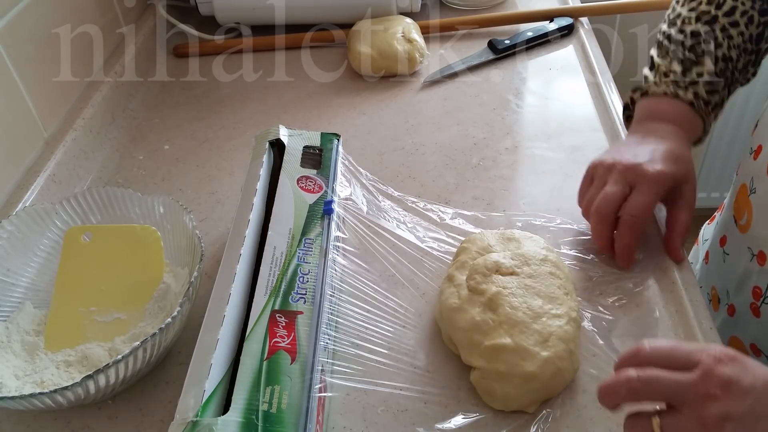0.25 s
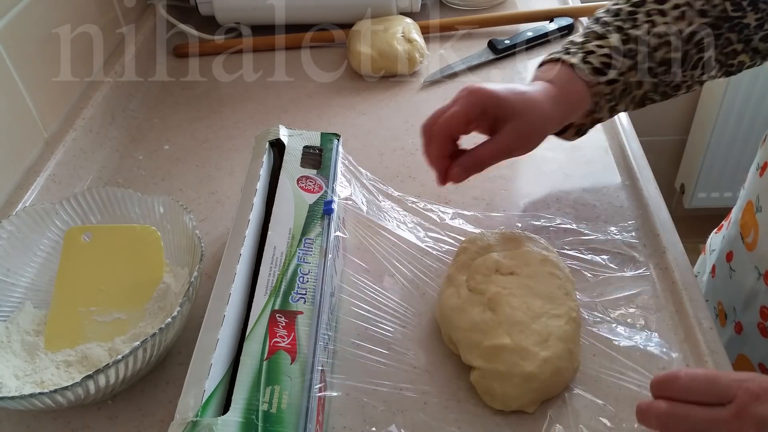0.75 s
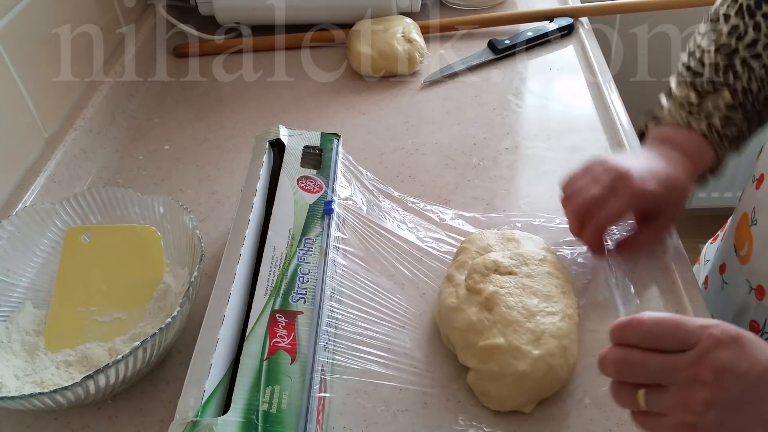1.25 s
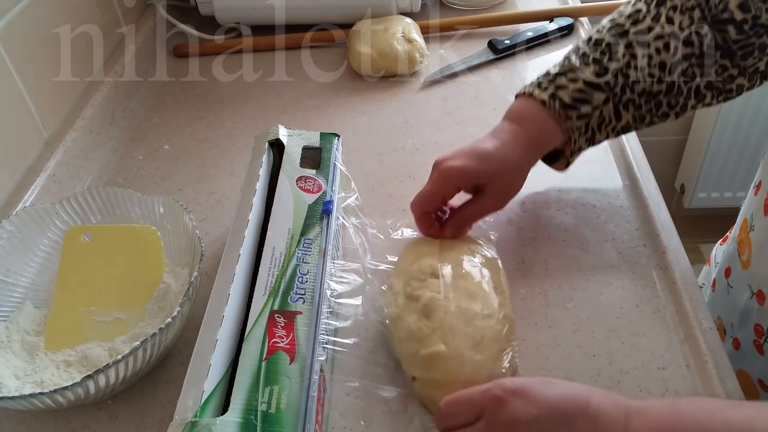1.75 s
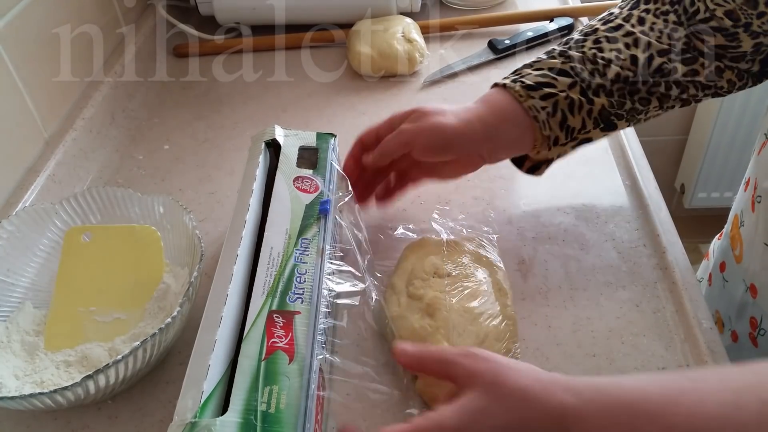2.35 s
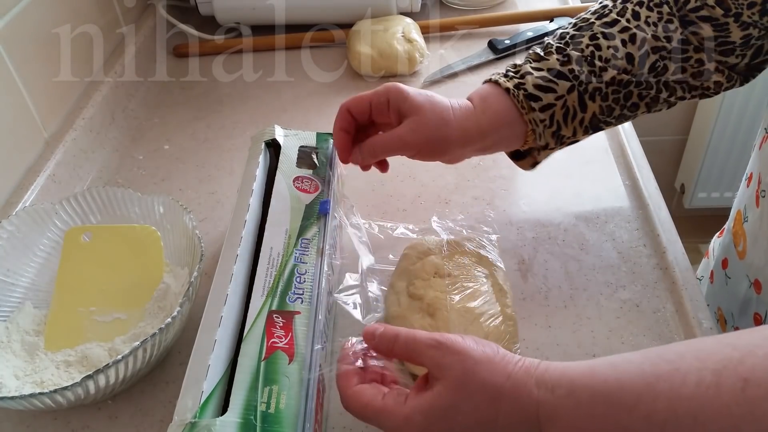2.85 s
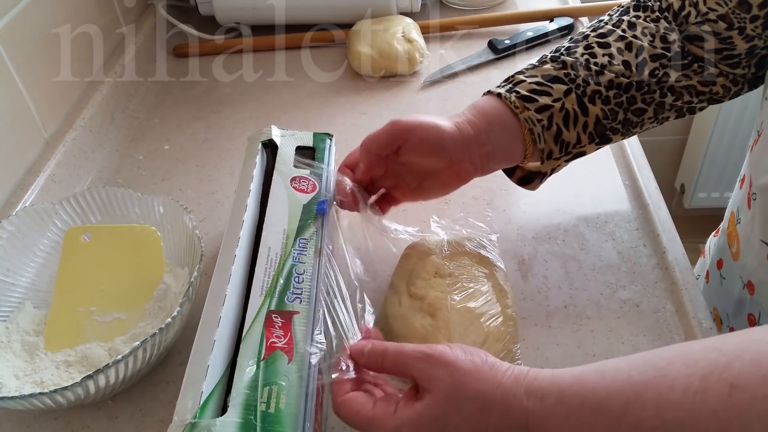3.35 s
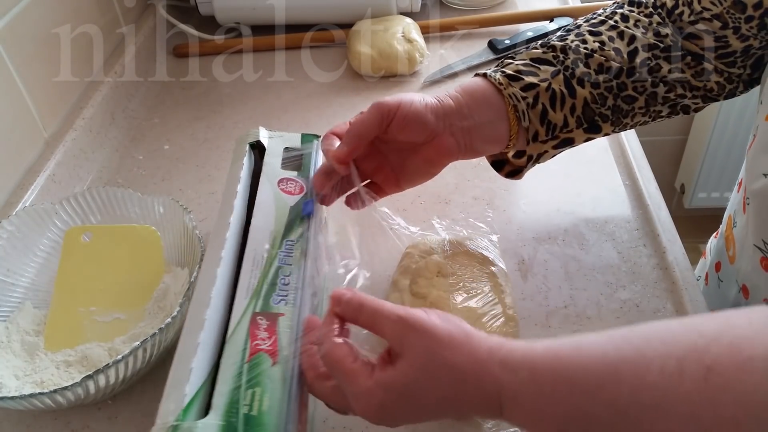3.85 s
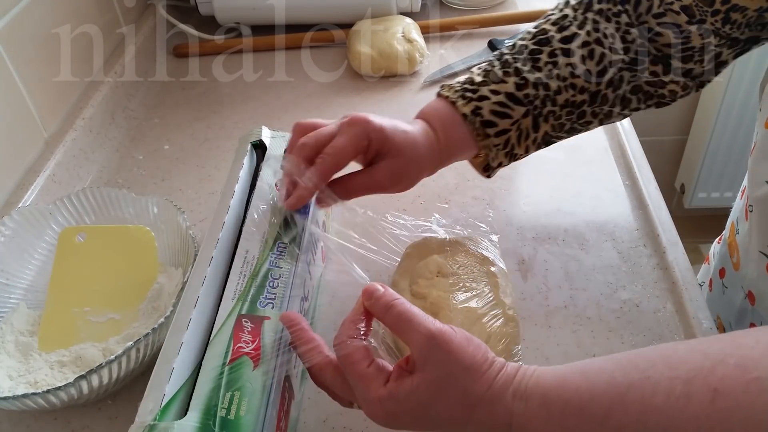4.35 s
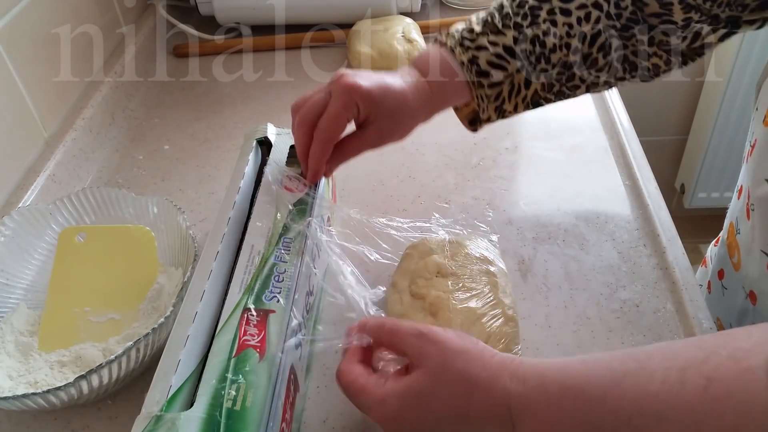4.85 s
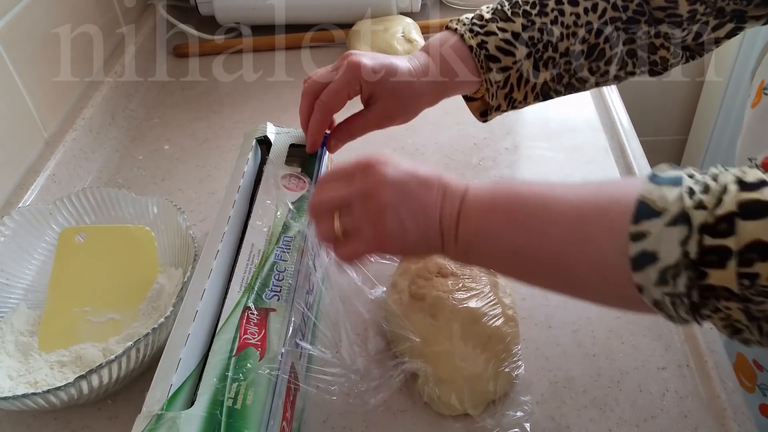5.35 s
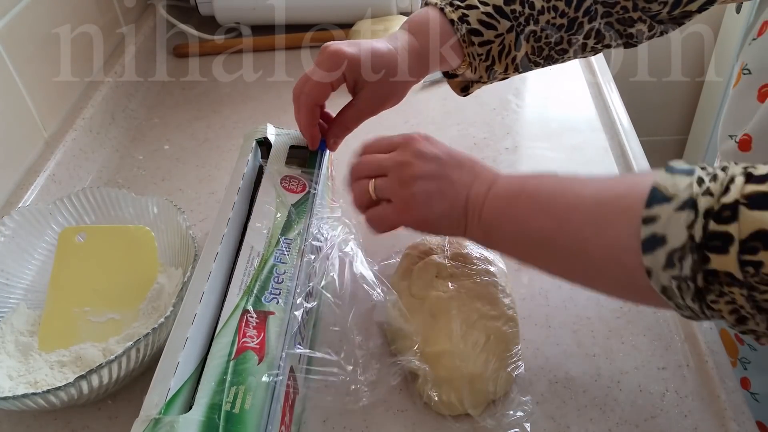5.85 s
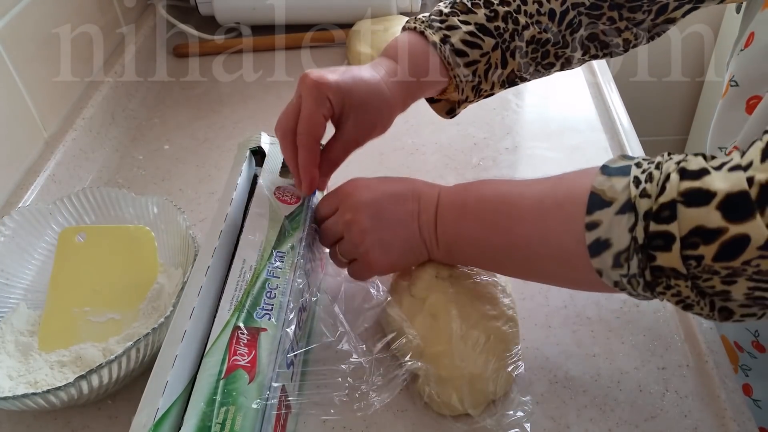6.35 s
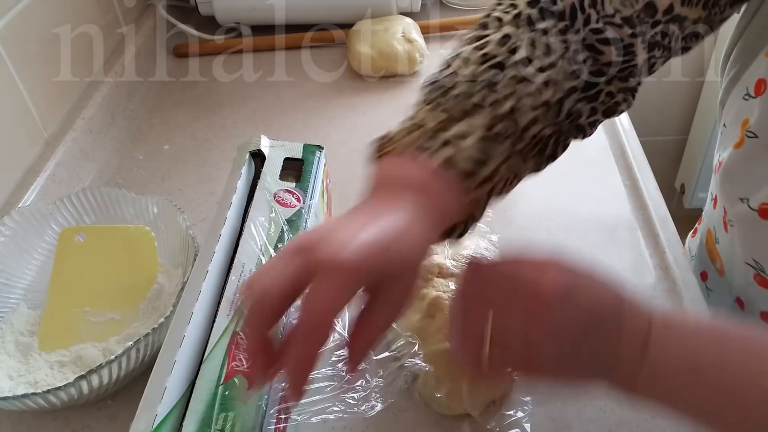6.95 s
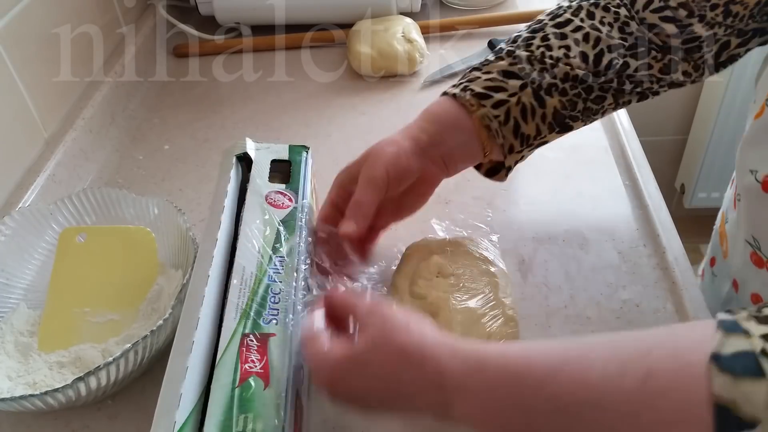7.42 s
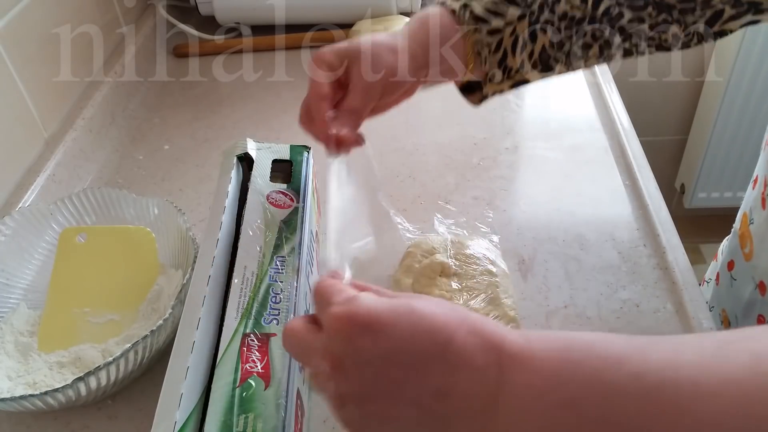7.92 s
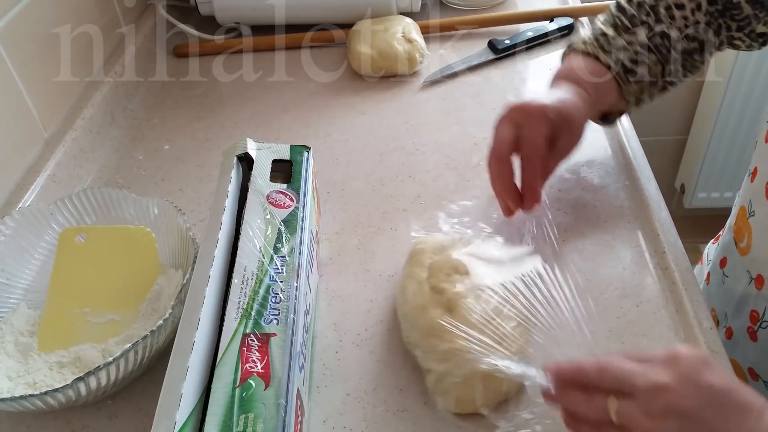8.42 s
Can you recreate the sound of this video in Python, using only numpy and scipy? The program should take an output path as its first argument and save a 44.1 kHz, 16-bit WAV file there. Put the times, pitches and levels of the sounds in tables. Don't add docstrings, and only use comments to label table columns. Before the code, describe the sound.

Hands work thin plastic film on a counter, heard at arm's length by a small stereo microphone with steady hiss, stronger on the left. Quiet crinkles and isolated ticks lead to light cardboard taps, then a cluster of hollow knocks. After a calmer stretch, another thump and dense crackling with bumps follow, then crisp loud snaps and a soft finish. A distant fridge hums; the room is small with a short tail.

```python
import sys
import numpy as np
from scipy import signal
from scipy.fft import rfft, irfft
from scipy.io import wavfile

SR = 44100
rng = np.random.default_rng(int(sys.argv[2]) if len(sys.argv) > 2 else 0)


def voltage_ratio(decibels):
    exponent = np.asarray(decibels, float) / 20
    return 10 ** exponent


def wrap_up_sound(samples):
    columns = np.atleast_2d(samples).T
    tamed = np.clip(columns, -1, 1)
    steps = np.round(tamed * 32767).astype(np.int16)
    wavfile.write(sys.argv[1], SR, steps)


N = 382684


def rms_one(x):
    return x / np.sqrt(np.mean(x ** 2) + 1e-20)


def butter(order, hz, kind, x):
    return signal.sosfilt(signal.butter(order, hz, kind, fs=SR, output="sos"), x)


def in_time(rows):
    s, *columns = np.transpose(rows)
    return [np.interp(np.arange(N) / SR, s, c) for c in columns]


def at_hz(points, hz):
    table_hz, values = np.array(points).T
    return np.interp(np.log(hz + 1), np.log(table_hz), values)


def colour(x, points):
    size = 8192
    cepstrum = irfft(np.log(voltage_ratio(at_hz(points, np.fft.rfftfreq(size, 1 / SR)))))
    cepstrum[1:size // 2] *= 2
    cepstrum[size // 2 + 1:] = 0
    return signal.oaconvolve(x, irfft(np.exp(rfft(cepstrum))))[:N]


def drift(per_s):
    knots = rng.standard_normal(2000)
    return np.interp(np.arange(N) / SR * per_s, np.arange(2000), knots)


def grains(per_s, spread_db, clump_db, clump_per_s):
    sizes = voltage_ratio(spread_db * np.minimum(rng.exponential(1, N), 4)) * rng.choice([-1, 1], N)
    born = rng.random(N) < per_s / SR
    return rms_one(sizes * born * voltage_ratio(clump_db * drift(clump_per_s)))


def dying(power, t60):
    r = voltage_ratio(-120 / (t60 * SR))
    return signal.lfilter([1 - r], [1, -r], power)


def ring(blows, hz, t60):
    r, w = voltage_ratio(-60 / (t60 * SR)), 2 * np.pi * hz / SR
    return signal.lfilter([0, np.sin(w)], [1, -2 * r * np.cos(w), r * r], blows)


def gestures(rows, shape):
    rise, fall, settle_db, settle = shape
    t, out = np.arange(0, N + 64, 64) / SR, -110
    for s, length, db, swell_db in rows:
        after = np.maximum(t - s - length, 0)
        swell = swell_db * np.clip((t - s) / max(length, 1e-3), 0, 1)
        held = db + swell - rise * np.maximum(s - t, 0)
        out = np.maximum(out, held + np.maximum(-fall * after, settle_db - settle * after))
    return np.interp(np.arange(N) / SR, t, out)


def treble_limit(x):
    return signal.sosfilt(signal.ellip(12, .5, 75, 15800, fs=SR, output="sos"), x)


# [f/Hz, likeness/-1..1]
PORT_LIKENESS = [(60, 1), (180, 0.54), (550, 0.38), (1650, 0.025), (4970, 0.11), (15000, 0.24)]


def pair(length):
    mid, side = rfft(rng.standard_normal((2, length)))
    alike = np.clip(at_hz(PORT_LIKENESS, np.fft.rfftfreq(length, 1 / SR)), -1, 1)
    return irfft(np.sqrt(.5 + alike / 2) * mid + np.sqrt(.5 - alike / 2) * side * [[1], [-1]], length)


def kitchen(x, near_db, near_t60, room_db, room_t60):
    t = np.arange(SR // 2) / SR
    near = voltage_ratio(near_db - 60 * t / near_t60)
    room = voltage_ratio(room_db - 60 * t / room_t60) * np.minimum(t / 0.00073, 1)
    echoes = pair(len(t)) * (near + room)
    echoes[:, 0] = 1
    return signal.oaconvolve(x * np.ones((2, 1)), echoes, axes=1)[:, :N]


# [f/Hz, density/dB per Hz]
ROOM_TONE = [(20, -31.5), (45, -8), (80, -15), (104, -1), (135, -13.5), (300, -18.5), (600, -23.5),
             (1000, -39.5), (2200, -51), (5000, -58.5), (12000, -61.5), (14000, -44), (15800, -41.5)]


def room_tone():
    tone = np.array([colour(side, ROOM_TONE) for side in pair(N)])
    return rms_one(tone) * voltage_ratio(-58 + np.array([[1.2], [-1.2]]))


# [f/Hz, width/Hz, left level/dB, right level/dB]
PORT_HISS = [
    (2822, 420, -65.5, -82.5),
    (3603, 476, -60.5, -92),
    (3990, 660, -67.5, -84),
]
# [t/s, level/dB]
STIR = [(0.0, -62), (0.48, -67.5), (1.16, -66.5), (1.5, -61.5), (1.93, -63), (2.17, -68.5), (3.82, -64),
        (4.2, -59.5), (4.59, -64.5), (5.87, -67.5), (6.86, -62.5), (7.15, -65.5), (7.39, -68),
        (7.71, -59.5), (8.39, -68), (8.68, -65.5)]


def port_hiss():
    stir_db, = in_time(STIR)
    stir_db = stir_db - np.median(stir_db)
    out = np.zeros((2, N))
    for hz, width_hz, *db in PORT_HISS:
        edges_hz = [hz - width_hz / 2, hz + width_hz / 2]
        hiss = rms_one(butter(3, edges_hz, "band", rng.standard_normal((2, N))))
        out += voltage_ratio(np.array(db)[:, None] + stir_db) * hiss
    return out


# [t/s, length/s, body level/dB, swell/dB, scuff above body/dB]
DRAGS = [(2.379, 0.038, -45.5, -3, -29), (2.426, 0.13, -56, 17, -17), (2.555, 0.056, -42, -6, -22),
         (3.025, 0.0087, -32.5, -14, -17.5), (3.077, 0.061, -48, 8, -19), (3.196, 0.51, -50, -6.5, -15.5),
         (3.77, 0.3, -43, 0, -14), (4.062, 0.13, -38, -14, -12.5), (4.18, 0.035, -21.5, -5, -30),
         (4.22, 0.091, -31, -3.5, -28), (4.329, 0.022, -50, -4, 1), (4.57, 0.046, -44.5, -3.5, -14.5),
         (4.623, 0.59, -55.5, 3.5, -13.5), (5.452, 0.23, -55, 6.5, -16), (6.036, 0.036, -40, 1, -14),
         (6.225, 0.055, -46.5, -5, -8.5), (6.29, 0.28, -49, -16, -13.5), (6.495, 0.11, -45, 0.5, -17),
         (6.638, 0.2, -39, -0.5, -22), (6.912, 0.099, -47, 6.5, -13), (7.393, 0.034, -30.5, -9, -28),
         (7.45, 0.19, -47, 5, -15.5), (7.72, 0.13, -56, 5, -6.5), (7.946, 0.018, -48.5, 4, -8)]
# [t/s, thud level/dB]
JOLTS = [(1.157, -42.5), (1.8, -43), (3.79, -36.5), (3.985, -42.5), (4.19, -32), (4.28, -33.5),
         (4.37, -40.5), (6.041, -33.5), (6.23, -48), (6.515, -37.5), (6.81, -47), (7.42, -41), (7.61, -38),
         (8.643, -33)]
# [t/s, rumble level/dB]
LEAN = [(0, -50), (.65, -65), (.94, -98), (1.3, -48.5), (2.34, -63), (2.7, -54), (3.6, -52.5), (4.6, -51.5),
        (5.65, -55.5), (5.95, -56), (6.3, -49.5), (7.0, -46.5), (7.15, -66.5), (7.5, -48.5), (8.05, -52.5),
        (8.5, -60.5)]


def box_levels():
    drag_shape, jolt_shape = (700, 239, -22, 26), (597, 211, -25, 60)
    lean_db, = in_time(LEAN)
    body = gestures([row[:4] for row in DRAGS], drag_shape)
    scuffs = [(s, length, db + scuff_db, swell) for s, length, db, swell, scuff_db in DRAGS]
    scuff = gestures(scuffs, drag_shape)
    thud = gestures([(s, .015, db, 0) for s, db in JOLTS], jolt_shape)
    return np.maximum(body, lean_db - 4.5), np.maximum(scuff, lean_db - 22.5), np.maximum(thud, lean_db)


# [f/Hz, density/dB per Hz]
THUD = [(25, -34), (45, 3), (65, 10.5), (110, 16), (160, 6.5), (300, -56)]


def counter_thud(thud_db):
    thud = rms_one(np.array([colour(side, THUD) for side in pair(N)]))
    return voltage_ratio(thud_db - 6.0) * thud


# [f/Hz, density/dB per Hz]
SCUFF = [(500, -10.5), (900, 0.5), (1600, -6), (2400, -3.5), (3600, -5.5), (4800, -17), (7000, -52)]


def cardboard(x):
    return colour(x, SCUFF)


def box_scuff(scuff_db):
    scuff = cardboard(grains(1200, spread_db=4.0, clump_db=4.5, clump_per_s=30))
    return voltage_ratio(scuff_db + 2.0) * rms_one(scuff)


# [t/s, peak level/dB, f/Hz, t60/s]
RAIL = [(1.5095, -52, 1750, .012), (2.364, -57, 2220, .009), (2.5742, -56, 1350, .009),
        (3.006, -61, 1440, .009), (4.3394, -52, 1640, .009), (4.569, -55, 2030, .009),
        (6.0322, -34, 2230, .015), (6.033, -44, 1500, .012), (6.032, -48, 3600, .008),
        (6.045, -48, 1500, .02), (6.9775, -46, 1730, .012), (7.0145, -40, 2310, .015),
        (7.0232, -46, 1770, .015), (7.381, -55, 2230, .009), (8.4975, -56, 1460, .009),
        (1.5098, -41.5, 2900, .012), (1.335, -55, 850, .01), (1.335, -63, 1700, .008),
        (8.6018, -41, 2860, .009), (7.9482, -37.5, 2700, .009), (7.7947, -45, 2600, .007),
        (8.4975, -58, 850, .012), (6.26, -52, 6200, .004), (7.383, -38, 280, .07), (6.962, -42, 370, .05),
        (4.339, -47, 2500, .015), (6.0322, -35, 850, .03), (6.0335, -33, 240, .06), (6.06, -44, 850, .05),
        (7.019, -49, 770, .08), (7.03, -48, 780, .08), (6.979, -48, 2450, .012), (6.984, -50, 1250, .02),
        (7.016, -50, 3400, .012), (4.172, -50, 3600, .02), (4.157, -31, 1080, .025), (4.157, -34, 330, .04),
        (4.339, -44, 900, .03), (4.338, -42, 340, .04), (7.9485, -46, 4300, .008),
        (8.6018, -45, 3800, .008), (1.468, -58, 2100, .012)]


def rail():
    out, click = np.zeros(N), np.eye(1, 3000)[0]
    for s, db, hz, t60 in RAIL:
        pad = butter(2, [hz / 1.9, hz * 1.45], "band", click)
        tone = ring(pad, hz, t60) - 0.12 * ring(pad, hz * 1.42, t60)
        out[round(s * SR):][:3000] += voltage_ratio(db + 11.0) * tone
    return out


# [t/s, peak level/dB, hardness/dB, struck panel f/Hz]
KNOCKS = [(2.362, -34, -12, 320), (2.5, -34.5, -9.5, 366), (2.572, -29.5, -5.5, 407),
          (3.004, -32, -18, 275), (3.139, -33, -24, 194), (3.745, -29, -21, 332), (3.918, -34, -8, 343),
          (3.974, -27.5, -12.5, 368), (4.058, -28, -8, 326), (4.157, -32, -6, 950), (4.162, -15.5, -6, 278),
          (4.167, -11.5, -9, 460), (4.173, -22.5, -3.5, 290), (4.182, -19, -9.5, 930),
          (4.187, -16, -4, 460), (4.2, -35, -20, 175), (4.234, -36, -20, 250), (4.253, -34, -19, 265),
          (4.269, -20, -11, 231), (4.336, -33, -12, 400), (4.565, -50, 6, 300), (5.65, -36, -14, 314),
          (6.032, -36, -12, 846), (6.034, -18.5, -26, 257), (6.04, -18, -16, 193), (6.059, -30, -16, 290),
          (6.227, -36.5, -16, 353), (6.337, -27.5, -15, 366), (6.525, -37, -14, 290),
          (6.608, -42, -27, 307), (6.685, -30.5, -17, 375), (6.705, -35, -27, 298), (6.733, -29, -18, 200),
          (6.787, -28.5, -16, 361), (6.823, -42, -30, 250), (6.838, -35, -32, 300), (6.96, -23.5, -19, 355),
          (6.98, -54, 0, 1240), (7.012, -52, 3, 290), (7.019, -46, -17, 745), (7.026, -44, -10, 760),
          (7.3815, -23, -20, 301.5), (7.393, -30.5, -28, 380), (7.613, -30, -10.5, 244),
          (7.775, -33, -6, 377), (7.946, -35, -20, 390)]
# [t/s, peak level/dB, hardness/dB]
BUMPS = [
    (1.148, -36, -40),
    (3.795, -27, -11.5),
    (4.779, -31.5, -20),
    (5.189, -45, -0.5),
    (5.37, -38, -20),
    (7.349, -30, -24),
    (7.589, -36.5, -4.5),
    (8.628, -39.5, -29.5),
    (8.659, -46, -18),
]
# [f/Hz, level/dB, t60/s]
BODY = [(70, -30.5, 0.081), (112.8, -10.5, 0.27), (173.8, 3, 0.059), (213.6, 4, 0.037), (252, 1.5, 0.038),
        (290, 5.5, 0.04), (356.8, 0.5, 0.078), (391, -4, 0.11), (486, -3, 0.054), (563, -3, 0.043),
        (635, -1.5, 0.039), (777, -6.5, 0.1), (813, -5.5, 0.069), (865, -5.5, 0.089), (930, -2, 0.044),
        (1054, -8, 0.067), (1220, -6.5, 0.035), (1269, -4.5, 0.037), (1600, -16, 0.021), (2080, -23, 0.02)]
# [f/Hz, left-right level/dB]
BOX_BALANCE = [(150, -0.2), (300, -4.6), (500, 5), (800, 2), (1200, 1.5), (1700, 13)]


def box_modes(body_db):
    counter_hz = 101
    hits = KNOCKS + [(*bump, counter_hz) for bump in BUMPS]
    at = [round(row[0] * SR) for row in hits]
    _, peak_db, hard_db, panel_hz = np.transpose(hits)
    out = np.zeros((2, N))
    for hz, db, t60 in BODY:
        high = np.clip(np.log2(hz / 400), 0, 1)
        slip_db = body_db - 35.5 - 6 * np.clip(high * 3, 0, 1)
        slips = grains(350, spread_db=4.5, clump_db=1.5, clump_per_s=29) * (hz > 150)
        blows = voltage_ratio(slip_db) * slips + 1e-18
        near_db = 12.1 * np.exp(-(np.log2(hz / panel_hz) / 0.24) ** 2)
        strength_db = peak_db - 20.5 + near_db + (hard_db + 14.5) * high
        luck_db = rng.normal(0, 2.65, len(hits))
        blows[at] += voltage_ratio(strength_db + luck_db) * rng.choice([-1, 1], len(hits))
        ringing = voltage_ratio(db) * ring(blows, hz, t60)
        lag = rng.integers(0, 56, 2) // (2 if hz > 1000 else 1)
        lean = voltage_ratio(at_hz(BOX_BALANCE, hz) / 2)
        out += [lean * np.roll(ringing, lag[0]), np.roll(ringing, lag[1]) / lean]
    return butter(4, 2300, "low", out)


def box(snap_lows):
    body_db, scuff_db, thud_db = box_levels()
    out = box_modes(body_db) + box_scuff(scuff_db) + snap_lows + rail()
    wet = kitchen(out, near_db=-29, near_t60=0.019, room_db=-38.0, room_t60=0.46) + counter_thud(thud_db)
    wet[1] = np.roll(wet[1], 7)
    return wet * voltage_ratio(np.array([[1.2], [-1.6]]))


# [t/s, length/s, crackle level/dB, swell/dB, low part/dB]
PULLS = [(0, 0.35, -60, -10, 0), (1.26, 0.31, -56.5, 7, 0), (1.55, 0.41, -58, -14.5, 0),
         (1.94, .11, -56, 3, -3), (2.38, 0.15, -65, 10.5, 0), (2.56, .14, -57, -11, 0),
         (2.72, 0.12, -63.5, 11.5, 0), (3.02, 0.032, -52.5, -7, 0), (3.09, 0.16, -60, 20, 0),
         (3.3, 0.11, -60.5, 11, 0), (3.42, 0.37, -56, -2, 0), (3.79, 0.16, -40.5, 3, -2),
         (3.97, 0.2, -45.5, 8.5, -2), (4.2, 0.14, -40.5, -4, -4), (4.33, 0.095, -56.5, 11, 0),
         (4.52, 0.1, -52, -9.5, 0), (4.64, 0.49, -64, 18, 0), (5.49, 0.175, -49, 7, -3),
         (6.04, 0.035, -41, 3.5, -4), (6.23, 0.13, -55.5, 5.5, 0), (6.42, 0.13, -58.5, 22, 0),
         (6.57, 0.19, -38.5, 6.5, -1), (6.7, 0.066, -30.5, -7, -3), (6.785, 0.064, -36, -10, -1),
         (6.88, 0.035, -35.5, 1.5, -2), (6.92, 0.13, -35.5, -24, 0), (7.44, 0.27, -45.5, 11.5, 0),
         (7.78, 0.037, -37, 2.5, 4), (7.95, 0.1, -40, -9.5, 4), (8.03, 0.42, -59, -14.5, 0),
         (8.58, 0.055, -44, -2, -6)]


def pull_levels():
    level = voltage_ratio(gestures([row[:4] for row in PULLS], (288, 370, -16.5, 99)))
    slack_db, = in_time([(s + length / 2, low_db) for s, length, _, _, low_db in PULLS])
    return level, slack_db


def crackle(level, slack_db):
    clicks = level * grains(1600, spread_db=2.5, clump_db=1.8, clump_per_s=41)
    bands = (300, 8300, .7), (8300, 11000, 2), (11000, 13500, 2), (13500, 17000, 2)   # Hz, Hz, wander dB
    out = np.zeros((2, N))
    for low_hz, high_hz, wander_db in bands:
        own_db = 3.76 * rng.standard_normal(N) + wander_db * drift(13)
        power = (clicks * voltage_ratio(own_db + slack_db * (high_hz < 9000) - 5.4)) ** 2
        power = dying(power, 0.012) + voltage_ratio(-3.0) * dying(power, 0.049) + voltage_ratio(-20) * dying(power, 0.49)
        out += np.sqrt(power) * butter(3, [low_hz, high_hz], "band", rng.standard_normal((2, N)))
    return out


def snaps(events, level, rise_s, t60, gain_db, tail_db, pop, kinds):
    split_hz, floor_hz = 6400, 1300
    steady, sudden, lows = np.zeros((2, N)), np.zeros((2, N)), np.zeros(N)
    t = np.arange(3000) / SR
    shape = (voltage_ratio(-60 * t / t60) + voltage_ratio(tail_db - 60 * t / 0.068)) * np.minimum(t / rise_s, 1)
    stock = rng.uniform(-1.45, 1, (kinds, 2, 3000))
    stock[:, :, 24] = pop
    for i, (s, db, pan_db, low_db) in enumerate(events):
        noise = stock[i % kinds]
        treble = butter(3, split_hz, "high", noise)
        lower = butter(2, [floor_hz, split_hz], "band", noise)
        noise = treble + voltage_ratio(np.clip(low_db + 20, -16, 2)) * lower
        burst = noise * shape * voltage_ratio(db + gain_db + np.array([[.5], [-.5]]) * pan_db)
        at = round(s * SR)
        stands_out = voltage_ratio(db - 28) > level[at - 300]
        head = stands_out * (t < .006)
        sudden[:, at:at + 3000] += burst * head
        steady[:, at:at + 3000] += burst * (1 - head)
        lows[at:at + 3000] += burst[0] * voltage_ratio(min(low_db, -12) + 4.5)
    return steady, sudden, lows


# [t/s, peak level/dB, left-right level/dB, low part/dB]
TICKS = [(0.1974, -43, -10, -35), (0.2124, -44, -13, -27), (1.0435, -56, -9, -28), (1.3354, -22.5, -3, -24),
         (2.0418, -46, -13, -30), (3.3797, -32, 4, -41), (3.6082, -40, -6, -37), (4.29, -28, -1, -27),
         (4.339, -34, -1, -16), (4.518, -36, -6, -17), (5.5965, -25.5, -9, -41), (6.2617, -29, 12, -24),
         (6.525, -30, 2, -16), (6.6048, -28, 12, -35), (6.8885, -22, 9.5, -40), (7.012, -28, -2, -7),
         (7.6912, -13, -6, -46), (7.7947, -18, -2, -28), (7.8047, -12, -2, -28), (3.009, -54, -3, -8),
         (7.948, -19, 3, -16), (7.9665, -18, -1, -16), (8.0355, -37, -3, -33), (8.474, -46.5, -7, -8),
         (8.6018, -28, -10, -40), (6.7315, -30, 4, -35), (6.7865, -29, 1, -35), (6.762, -32, 4, -35),
         (7.0105, -38, 0, -30)]


def ticks(level):
    return snaps(TICKS, level, rise_s=.0003, t60=.005, gain_db=1.5, tail_db=-15, pop=4.5, kinds=25)


# [t/s, peak level/dB, left-right level/dB, low part/dB]
RIPS = [(0.181, -43, -4, -31), (1.4678, -31, -2, -26), (1.5088, -26.5, 6, -22), (2.0066, -45, -7, -6),
        (2.8392, -43, 3.5, -11.5), (3.3563, -42, 0, -35), (3.6507, -43.5, -3, -22), (3.722, -38, -4, -29),
        (3.73, -36.5, 5.5, -23.5), (3.8721, -36, 3, -19), (3.898, -36.5, -1, -21), (4.1744, -35, -7, -4),
        (6.0315, -41, 0, -30), (6.5919, -33, 2, -33), (6.67, -30.5, 11, -28), (6.687, -30.5, 9, -36),
        (6.7297, -33, 6.5, -28), (6.7845, -26.5, 1, -36.5), (6.9417, -33, 6.5, -32),
        (7.5864, -28.5, -2, -22), (7.662, -24.5, 3, -26), (7.773, -27.5, -2, -12), (8.4971, -50, -4, -25),
        (3.7542, -42, 5, -25), (3.7732, -38, 2, -25), (3.7946, -36, 3, -25), (8.604, -37, -8, -35),
        (4.0585, -36, 4, -25), (4.3688, -45, -4, -25), (4.4037, -46, 13, -25), (7.9495, -29, 3, -20),
        (7.4153, -51, 2, -22.5), (7.4921, -43, 0.1, -21.5), (7.5071, -36, -4, -24),
        (7.5245, -33.5, 1.5, -12), (0.0892, -54, -2, -30), (0.1156, -54, -3.5, -30), (0.24, -57, -3, -30),
        (0.295, -58, -3, -30), (0.332, -57, -3, -30), (1.2446, -55, -3.5, -30), (1.3673, -50, -1.5, -30),
        (2.8205, -49, 1.5, -30), (4.428, -47, 3, -30), (5.4879, -47, 3, -30), (5.5432, -42, 2, -30),
        (5.657, -41, 2, -26), (6.318, -50, 2.5, -30), (6.4941, -46, 1, -30), (6.905, -37, 3, -30)]


def rips(level):
    return snaps(RIPS, level, rise_s=.0012, t60=.03, gain_db=3.0, tail_db=-8, pop=.3, kinds=35)


# [f/Hz, density/dB per Hz]
FILM_LEFT = [(700, -8.5), (1500, -17), (3000, -15.5), (3700, -12), (5000, -23.5), (6500, -33.5),
             (8000, -17), (9500, -5.5), (13000, -6), (15500, -4)]
# [f/Hz, density/dB per Hz]
FILM_RIGHT = [(700, -23), (1500, -18.5), (3500, -24.5), (5000, -30), (7000, -29), (9500, -71), (12000, -11),
              (15000, -0.5), (15800, -3)]


def film():
    level, slack_db = pull_levels()
    tick_steady, tick_sudden, tick_lows = ticks(level)
    rip_steady, rip_sudden, rip_lows = rips(level)
    steady = treble_limit(crackle(level, slack_db) + tick_steady + rip_steady)
    left, right = steady + butter(8, 16000, "low", tick_sudden + rip_sudden)
    heard = np.array([colour(left, FILM_LEFT), colour(right, FILM_RIGHT)])
    return voltage_ratio(6.0) * heard, cardboard(tick_lows + rip_lows)


def scene():
    film_sound, snap_lows = film()
    return treble_limit(room_tone() + port_hiss() + box(snap_lows)) + film_sound


def band_limit(x):
    return signal.sosfilt(signal.butter(12, 16700, fs=SR, output="sos"), x)


def record(dry):
    mix = butter(4, 54, "high", dry)
    mix = mix * np.minimum(np.arange(N)[::-1] / 512, 1)
    return band_limit(mix)


dry = scene()
out = record(dry)
wrap_up_sound(out)
```